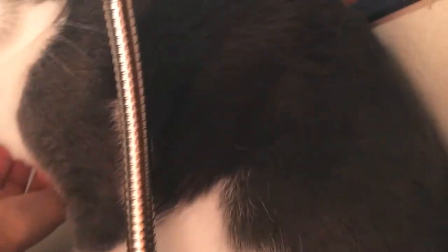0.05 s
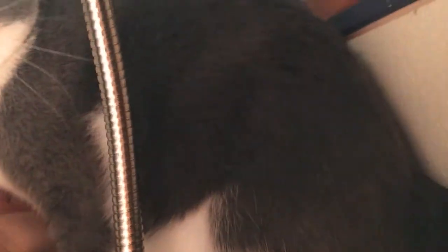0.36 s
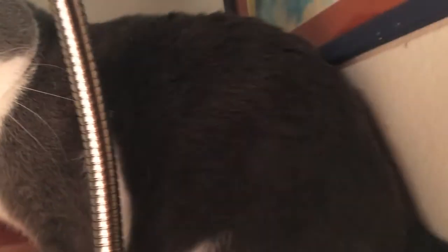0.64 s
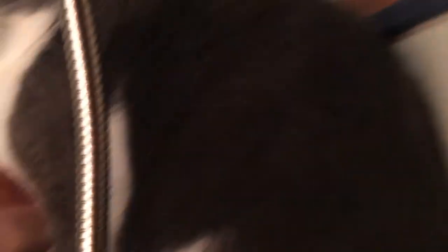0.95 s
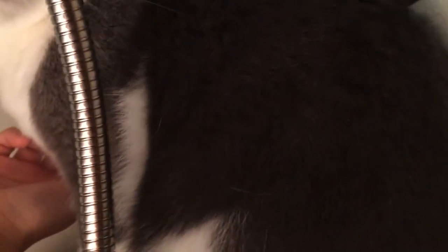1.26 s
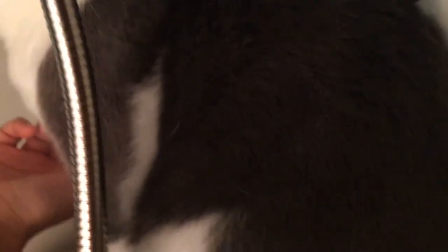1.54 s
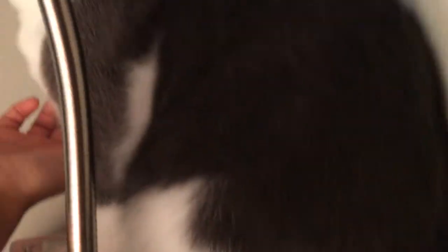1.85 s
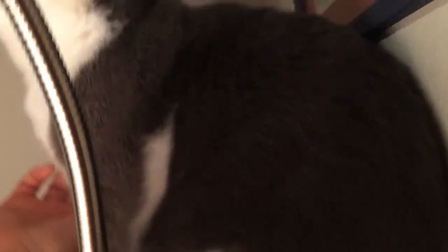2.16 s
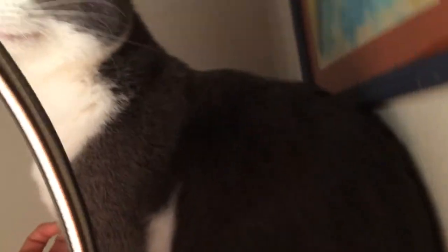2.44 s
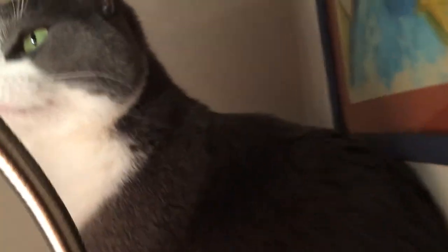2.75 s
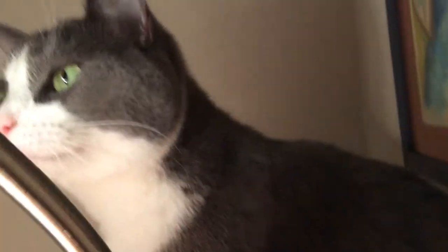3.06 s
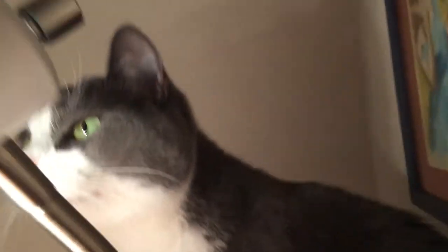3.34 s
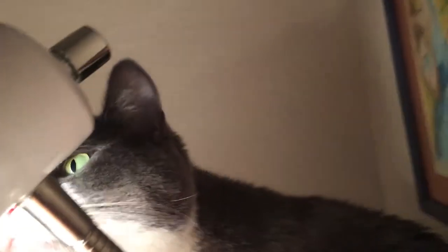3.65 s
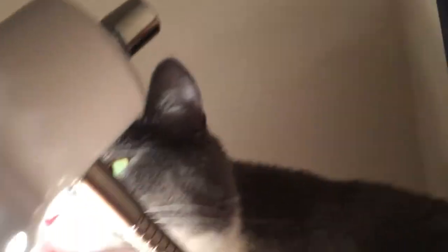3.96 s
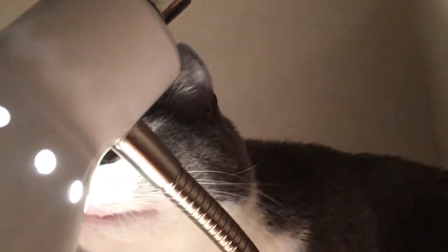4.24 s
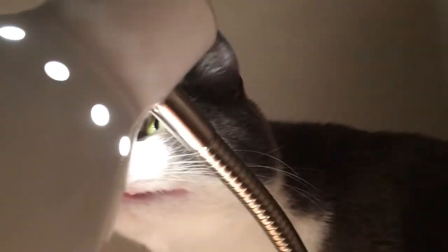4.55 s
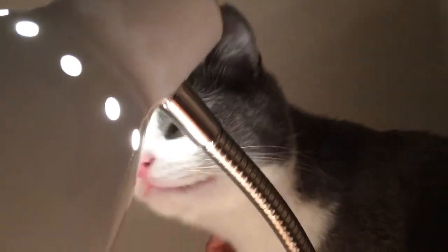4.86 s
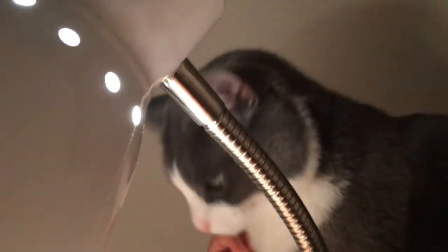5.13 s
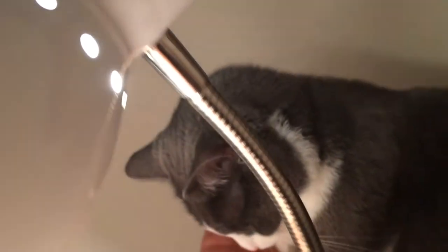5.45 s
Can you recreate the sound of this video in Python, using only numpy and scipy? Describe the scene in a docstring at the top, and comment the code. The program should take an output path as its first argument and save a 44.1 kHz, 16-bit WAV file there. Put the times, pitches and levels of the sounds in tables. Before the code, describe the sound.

A cat purrs close to the microphone in a small, quiet room, a low throb that shifts with each breath in and out. Near the start, fur swishes and a grazed metal lamp rings faintly, then something wooden knocks sharply and rattles to rest. The purring carries on, with a few soft taps and faint swells of hiss over a low room tone.

```python
"""A cat purrs close to the microphone in a small, quiet room, about 26 throat beats a second.
Each opening of the throat gives a low throb and a puff of air: sharp thuds breathing in, softer and
rounder ones breathing out. Fur brushes by, a grazed metal lamp rings faintly, and something wooden knocks
and rattles to rest. A few soft taps and two faint swells of hiss lie over the low room tone."""
import sys
import numpy as np
from scipy import signal
from scipy.fft import rfft, irfft, next_fast_len
from scipy.io import wavfile

SR = 44100
rng = np.random.default_rng(int(sys.argv[2]) if len(sys.argv) > 2 else 0)


def store_pcm(level_fs):
    """Save levels as 16-bit WAV."""
    pcm = np.round(np.clip(level_fs, -1, 1) * 32767).astype(np.int16)
    wavfile.write(sys.argv[1], SR, np.atleast_2d(pcm).T)


N = 250909


def amp(db):
    """Decibels to gain."""
    return 10 ** (np.asarray(db) / 20)


def unit(x):
    """Scale to rms 1."""
    return x / np.sqrt(np.mean(x ** 2) + 1e-20)


def along(points, hz):
    """Read (Hz, value) points on a log frequency axis."""
    point_hz, values = np.transpose(points)
    return np.interp(np.log(hz + 1), np.log(point_hz + 1), values)


def filtered(x, response):
    """Filter x by a gain given as a function of Hz."""
    size = next_fast_len(len(x) + 8192)
    return irfft(rfft(x, size) * response(np.fft.rfftfreq(size, 1 / SR)), size)[:len(x)]


def noise(spectrum, size=N):
    """Coloured noise of rms 1. Each row of the spectrum: frequency in Hz, relative density in dB."""
    return unit(filtered(rng.standard_normal(size), lambda hz: amp(along(spectrum, hz))))


def soften(x, edge_hz):
    """Low-pass, as a soft contact leaves out the treble."""
    return signal.lfilter(*signal.butter(2, min(edge_hz, SR / 3), fs=SR), x)


def add(track, start_s, sound):
    """Mix a sound into the track from start_s on."""
    start = max(round(start_s * SR), 0)
    track[start:start + len(sound)] += sound[:max(N - start, 0)]


def swell(peak_s, rise_s, fall_s):
    """A bell-shaped envelope with its own rise and fall times."""
    t = np.arange(N) / SR - peak_s
    return np.exp(-(t / np.where(t < 0, rise_s, fall_s)) ** 2)


def ring(modes, t):
    """Decaying modes, struck at slightly new strengths and in new phases each time."""
    return sum(amp(db + rng.standard_normal() - 60 * t / t60)
               * np.sin(2 * np.pi * (hz * t + rng.random())) for hz, db, t60 in modes)


def thud(modes, t):
    """Damped resonances that all start together from rest."""
    return sum(amp(db - 60 * t / t60) * np.sin(2 * np.pi * hz * t) for hz, db, t60 in modes)


def room(x):
    """The small room's diffuse answer, each frequency dying at its own speed."""
    # Reverberation. Each row: frequency in Hz, t60 in seconds.
    decay_times = [(120, 0.56), (500, 0.22), (2000, 0.35), (5000, 0.56), (12000, 0.11)]
    hz, t, spectra = signal.stft(rng.standard_normal(SR // 3), SR, nperseg=256)
    decay = amp(-60 * t / along(decay_times, hz)[:, None])
    tail = signal.istft(spectra * decay, SR, nperseg=256)[1]
    return signal.oaconvolve(x, tail / np.linalg.norm(tail))[:N]


def room_tone(level_db=-65, drift_db_per_s=-0.2943):
    """The room's low rumble and faint hiss, slowly sinking in level together."""
    # The quiet room. Each row: frequency in Hz, relative density in dB.
    air = [(20, -8), (50, 6.5), (110, -3), (220, -3.5), (400, -10), (650, -17), (1500, -20.5),
           (2100, -22.5), (2800, -22.5), (4000, -25), (6000, -26), (10000, -28.5), (15500, -31.5)]
    return amp(level_db + drift_db_per_s * np.arange(N) / SR) * noise(air)


def soft_hiss(grain_db=2, grain_hz=60):
    """Two faint swells of hiss: a slow one like stroked fur, then a short one like a breath or sniff."""
    # Each row: peak in seconds, level in dB, rise and fall in seconds, cutoff in Hz.
    swells = [(1.65, -71, .45, 0.72, 11700), (3.05, -68.5, .03, 0.22, 4500)]
    # Colour of the hiss. Each row: frequency in Hz, relative density in dB.
    hiss_spectrum = [(200, 0), (600, 1.5), (1200, -0.5), (1900, -1), (2800, -1.5), (4000, -7), (6000, -8),
                     (10000, -14), (15500, -5.5)]
    hiss = sum(amp(db) * swell(peak_s, rise_s, fall_s) * soften(noise(hiss_spectrum), bright_hz)
               for peak_s, db, rise_s, fall_s, bright_hz in swells)
    grain = unit(soften(rng.standard_normal(N), grain_hz))
    return hiss * amp(grain_db * grain)


def fur_brush(peak_s=0.325, db=-65):
    """Fur brushes by in one short, airy swish."""
    # Sliding fur. Each row: frequency in Hz, relative density in dB.
    fur = [(500, -26), (1300, 0), (2400, 0), (4500, -8), (6500, -1.5), (10000, -8), (15500, -12.5)]
    return amp(db) * swell(peak_s, rise_s=0.06, fall_s=0.025) * noise(fur)


def lamp(start_s=0.502, db=-73, rise_s=0.013, tremble_depth=2.0):
    """The lamp's metal is grazed and rings thinly, each mode trembling under the scrape."""
    # Modes of the metal. Each row: frequency in Hz, relative level in dB, t60 in seconds.
    metal_modes = [(3050, -6, 0.58), (4240, -3, 0.55), (5450, -0.5, 0.41), (6900, 2.5, 0.27),
                   (6850, -7.5, 0.18), (8060, 5, .13), (10000, 2, 0.15), (11500, 5, 0.17), (12100, -3, .1),
                   (13700, -5, 0.17)]
    track, t = np.zeros(N), np.arange(SR // 4) / SR
    onset = 1 - np.exp(-t / rise_s)
    for mode in metal_modes:
        tremble = 1 + tremble_depth * noise([(100, -11), (300, -17), (1100, -33)], size=len(t))
        add(track, start_s, amp(db) * ring([mode], t) * tremble * onset)
    return track


def taps(tick_db=-3, tick_t60=0.011, room_db=-10):
    """Small contacts near the microphone: one damped resonance under a short, muffled tick."""
    # Each row: start in seconds, level in dB, pitch in Hz, t60 in seconds, the tick's cutoff in Hz.
    soft_taps = [(.033, -54, 960, 0.022, 1400), (1.024, -56, 420, 0.024, 700), (1.737, -50, 376, 0.04, 700),
                 (2.822, -49, 283, 0.048, 600), (2.846, -56, 1500, 0.011, 4470),
                 (3.019, -39, 343, 0.037, 860), (3.239, -44.5, 203, 0.043, 400),
                 (3.417, -48.5, 330, 0.027, 500)]
    track, t = np.zeros(N), np.arange(SR // 5) / SR
    for start_s, db, hz, t60, bright_hz in soft_taps:
        tick = unit(soften(rng.standard_normal(len(t)), bright_hz)) * amp(tick_db - 60 * t / tick_t60)
        resonance = thud([(hz, 0, t60)], t)
        add(track, start_s, amp(db) * soften(resonance + tick, 2 * bright_hz))
    return track + amp(room_db) * room(track)


def contacts(touch_db=-8.5, touch_brighter=1.7, touch_t60=0.037, touch_edge_db=-22, blow_edge_db=-31):
    """At each bounce of the wood one edge touches, weaker and brighter, just before the full blow."""
    # Each row: time of the blow in seconds, level in dB, cutoff in Hz, the crack's t60 in seconds,
    # lead of the first touch in seconds.
    bounces = [(0.623, -19.5, 2400, 0.083, .0101), (0.6619, -25.5, 1120, 0.073, 0.0084),
               (.695, -37.5, 750, 0.029, 0.0091), (.721, -33, 785, 0.037, .008),
               (0.754, -56, 500, .04, 0.0056)]
    for blow_s, db, bright_hz, crack_t60, lead_s in bounces:
        yield blow_s - lead_s, db + touch_db, bright_hz * touch_brighter, touch_t60, touch_edge_db
        yield blow_s, db, bright_hz, crack_t60, blow_edge_db


def wooden_knock(ring_db=-14, crack_db=-3, thud_db=-3, metal_db=-39, room_db=-14,
                 t60_scale=0.64, choke=0.36, hard_blow_db=-21):
    """A wooden thing strikes hard and rattles to rest in duller bounces; a metal part rings along."""
    # Modes of the wood. Each row: frequency in Hz, relative level in dB, t60 in seconds before scaling.
    wood_modes = [(120, -7.5, 0.44), (237, -8.5, 0.31), (286, -1, 0.14), (318.5, 0, 0.23), (412, -9, 0.18),
                  (447, 1, 0.2), (481.6, -6.5, 0.2), (575, -10, 0.35), (649, -8.5, 0.36), (766, -1, 0.23),
                  (836, -1, 0.13), (906, -3, .18), (1110, -18, 0.2), (1217, -9, 0.12), (1284, -2.5, 0.19),
                  (1297, -1.5, 0.21), (1420, -10, 0.23), (1690, -5, 0.23), (1736, -2.5, 0.23),
                  (1857, -38, .25), (1997, -15, 0.058), (2060, -17, 0.088), (2225, -18, 0.09),
                  (2590, -20, 0.12), (2980, -25, .18), (3190, -6.5, 0.078), (3240, -12.5, 0.11)]
    # Modes of its metal part and its hollow. Each row: frequency in Hz, relative dB, t60 in seconds.
    metal_modes = [(4032, -5, 0.4), (4242, -4, 0.22), (5114, 3, 0.4), (5400, 6, .28), (5220, 6.5, 0.27),
                   (5950, -4, 0.43)]
    hollow_modes = [(319, 1.5, 0.053), (808, -5.5, 0.038), (2120, -7, 0.033), (3280, -11, 0.016)]
    # Noise of the impact. Each row: frequency in Hz, relative density in dB.
    crack_spectrum = [(30, -35), (60, -17), (125, 2.5), (200, -4.5), (330, 1.5), (470, 1), (580, -12.5),
                      (800, 0), (1050, -22), (1320, -17.5), (2100, -11), (2700, -21.5), (3600, -28),
                      (6000, -29.5), (14000, -22.5)]
    track, t = np.zeros(N), np.arange(SR // 4) / SR
    damped_modes = [(hz, db, t60 * t60_scale) for hz, db, t60 in wood_modes]
    for start_s, db, bright_hz, crack_t60, edge_db in contacts():
        crack = noise(crack_spectrum, size=len(t)) * amp(crack_db - 60 * t / crack_t60)
        freedom = amp(choke * (db - hard_blow_db))  # light bounces stay in contact longer and ring less
        ringing = amp(ring_db) * ring(damped_modes, t) + amp(metal_db) * ring(metal_modes, t)
        blow = crack + amp(thud_db) * thud(hollow_modes, t) + freedom * ringing
        sharp_edge = amp(edge_db) * blow
        add(track, start_s, amp(db) * (soften(blow, bright_hz) + sharp_edge))
    return track + amp(room_db) * room(track)


def throat_beats(jitter_s=0.00095, lag_s=0.0032, onset_db=-4.5):
    """Yield each beat's time in seconds, effort in dB, inward share and whether it opens a breath."""
    # The cat's breaths. Each row: first and last beat in seconds, number of beats, inward share from
    # 0 to 1, held effort in dB, attack and release in seconds, fall over the release in dB.
    breaths = [(0.026, 0.215, 6, 0.1, -55.5, 0, 0.037, 10),
               (0.254, 0.604, 10, 0.71, -54.5, 0.0022, 0.043, -2.5),
               (0.638, 0.988, 10, 0.29, -53.5, 0, 0.3, 9), (1.022, 1.469, 13, 0.07, -52.5, .16, 0.14, 3),
               (1.505, 1.977, 13, 0.97, -53, 0.045, 0.074, 9.5),
               (2.018, 2.401, 11, 0.05, -53, 0.059, 0.035, 3.5),
               (2.436, 2.76, 9, 0.86, -51.5, 0.057, 0.16, 5.5),
               (2.799, 3.186, 11, 0.11, -54, 0.17, 0.099, 10), (3.223, 3.58, 10, 0.93, -53, 0, 0.097, 11.5),
               (3.618, 3.691, 3, 0, -53.5, 0, .045, 14), (3.73, 4.064, 9, 0.81, -46.5, 0.084, 0.1, 18),
               (4.102, 4.216, 4, 0.08, -54.5, 0.061, .04, 0.5), (4.293, 4.626, 9, 0.62, -46.5, 0, 0.16, 19),
               (4.656, 4.9, 7, 0.3, -61.5, 0.13, .04, -2), (4.939, 5.324, 11, 0.09, -52, 0, 0.43, 5.5),
               (5.403, 5.673, 8, 0.62, -58.5, 0, 0.092, 12.5)]
    for first_s, last_s, count, inward, held_db, attack_s, release_s, fall_db in breaths:
        for progress in np.linspace(0, 1, round(count)):
            beat_s = first_s + (last_s - first_s) * progress
            beat_s += lag_s * inward * np.sin(np.pi * progress)  # an in-breath hurries at its end
            swelling = max(1 - (beat_s - first_s) / attack_s, 0) if attack_s > 0 else 0
            fading = max(1 - (last_s - beat_s) / release_s, 0)
            effort_db = held_db + onset_db * swelling - fall_db * fading
            yield beat_s + jitter_s * rng.standard_normal(), effort_db, inward, progress == 0


def throb(parts, t, stretch=1, pitch_spread=0.067, chest_scatter_db=1, throat_scatter_db=2):
    """One beat around t = 0: first the chest's swing, which can stretch, then the throat's resonances."""
    wave = np.zeros(len(t))
    for k, (hz, width_s, db) in enumerate(parts):
        part_t, scatter_db = (t / stretch, chest_scatter_db) if k == 0 else (t, throat_scatter_db)
        pitch_hz = hz * (1 + pitch_spread * rng.standard_normal())
        gain = amp(db + scatter_db * rng.standard_normal())
        wave += gain * np.exp(-0.5 * (part_t / width_s) ** 2) * np.cos(2 * np.pi * pitch_hz * part_t)
    return wave


def purr(beat_db=11.0, rasp_in_db=-17.5, rasp_out_db=-23, rasp_t60=0.17, rasp_lead_s=0.00427,
         snap_db=-11, stretch_per_db=0.02, easy_effort_db=-54):
    """The cat, close up: each opening of the throat gives a low throb and a puff of rasping air."""
    # Parts of a beat, breathing in and out. Each row: frequency in Hz, half length in seconds
    # (both before any stretch), relative level in dB.
    beat_in = [(121.2, 0.0043, -1), (181, 0.0078, -13), (332, 0.0033, -21), (406.4, 0.0051, -22)]
    beat_out = [(132.5, 0.0059, -3), (308, 0.005, -23.5), (422, 0.0069, -29)]
    # Air in the throat. Each row: frequency in Hz, relative density in dB.
    rasp_spectrum = [(40, 1), (130, 8), (250, 2.5), (420, -10.5), (580, -19), (850, -17), (1500, -21.5),
                     (3000, -35.5), (8000, -52)]
    # Reflections from walls near the microphone. Each row: delay in seconds, gain in dB.
    near_walls = [(.0098, -21), (0.0157, -20.5), (0.022, -19)]
    lead_samples = SR // 45
    t = np.arange(-lead_samples, 2 * lead_samples) / SR
    puff_t = t + rasp_lead_s
    puff = np.clip(puff_t / 0.0029, 0, 1) * amp(-60 * np.abs(puff_t) / rasp_t60)
    # The folds part abruptly as an in-breath begins.
    snap = amp(snap_db) * np.exp(-0.5 * ((t + 0.0024) / 0.0015) ** 2)
    body, flow = np.zeros(N), np.zeros(N)
    for beat_s, effort_db, inward, opens in throat_beats():
        strength = amp(effort_db + beat_db)
        # Harder inward beats swing wider and sound deeper.
        stretch = np.exp(stretch_per_db * (effort_db - easy_effort_db))
        beat = inward * throb(beat_in, t, stretch) + (1 - inward) * throb(beat_out, t)
        add(body, beat_s + t[0], strength * beat)
        rasp = amp(inward * rasp_in_db + (1 - inward) * rasp_out_db + 2 * rng.standard_normal())
        add(flow, beat_s + t[0], strength * (rasp * puff + opens * inward * snap))
    track = body + flow * noise(rasp_spectrum)
    for delay_s, db in near_walls:
        add(track, delay_s, amp(db) * body)
    return track


def scene():
    """The cat and the room around it, at one close microphone."""
    return (purr() + wooden_knock() + taps() + lamp() + fur_brush() + soft_hiss() + room_tone())[None]


def record(dry, low_hz=45, top_hz=15900):
    """The microphone thins out the deepest bass and keeps nothing above its band limit."""
    thinned = signal.lfilter(*signal.butter(1, low_hz, "high", fs=SR), dry[0])
    return filtered(thinned, lambda hz: hz < top_hz)[None]


dry = scene()
out = record(dry)
store_pcm(out)
```